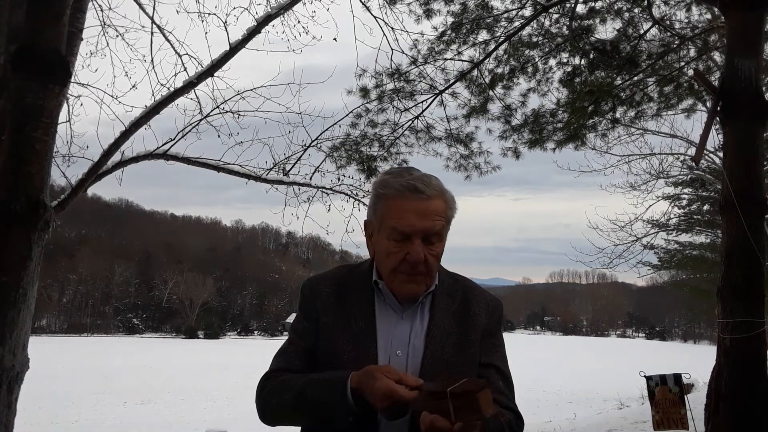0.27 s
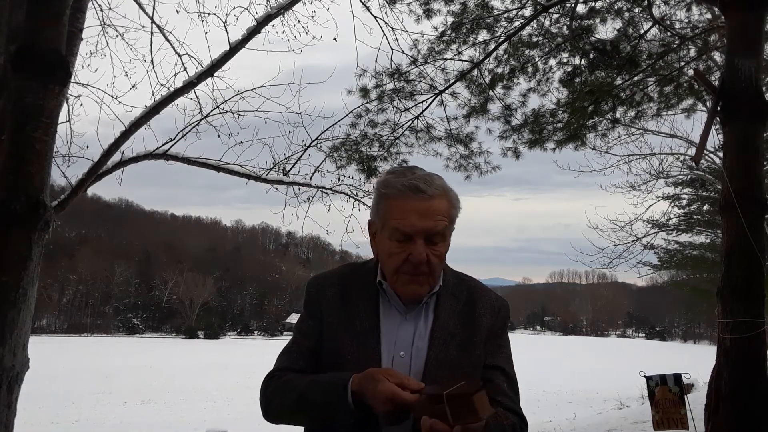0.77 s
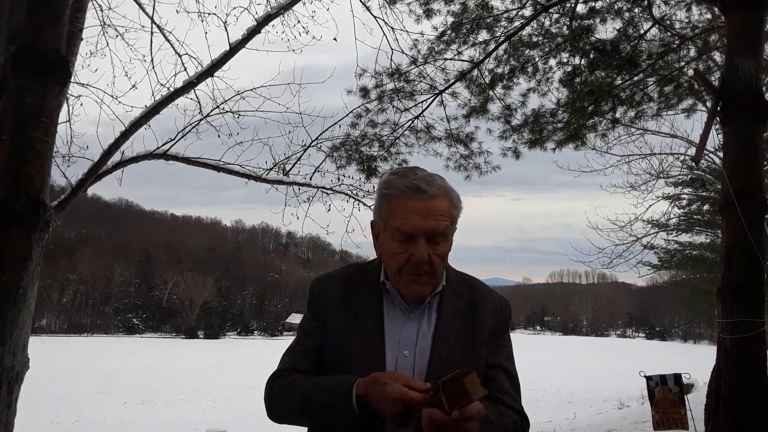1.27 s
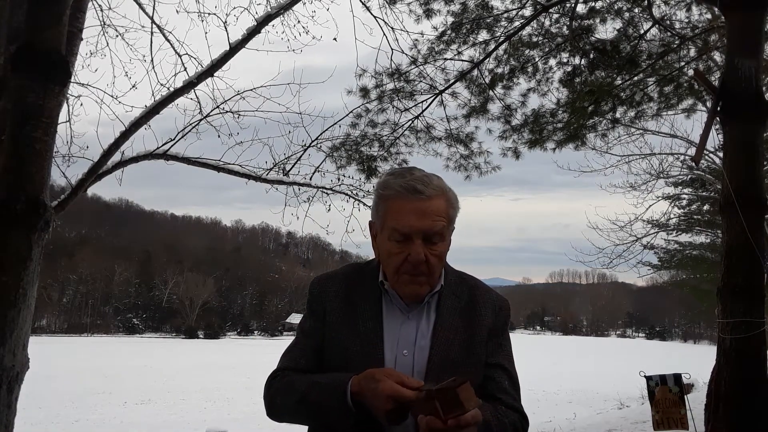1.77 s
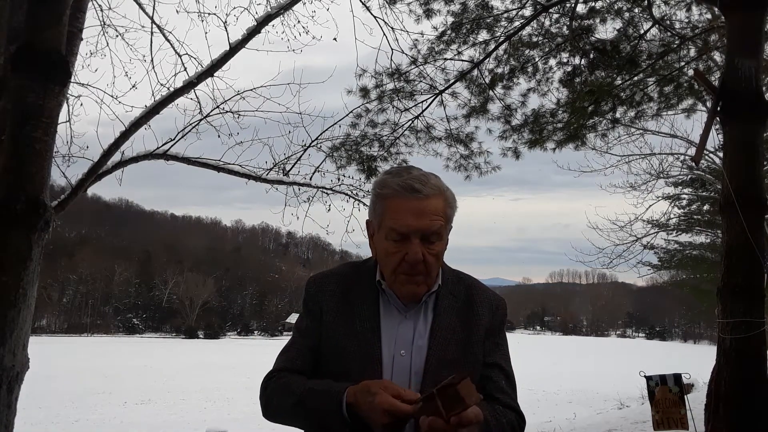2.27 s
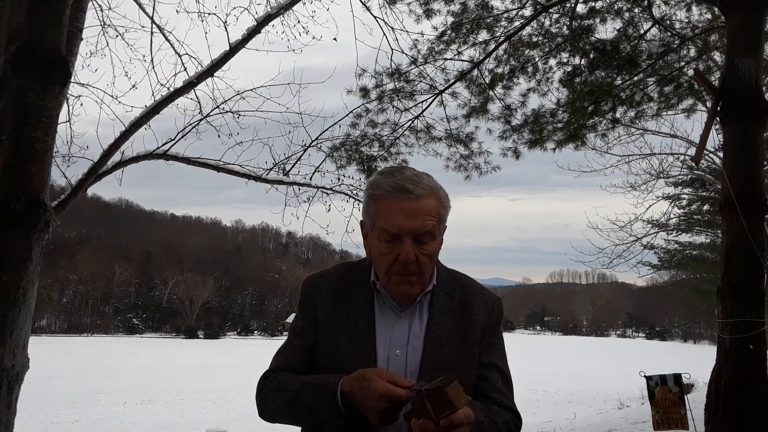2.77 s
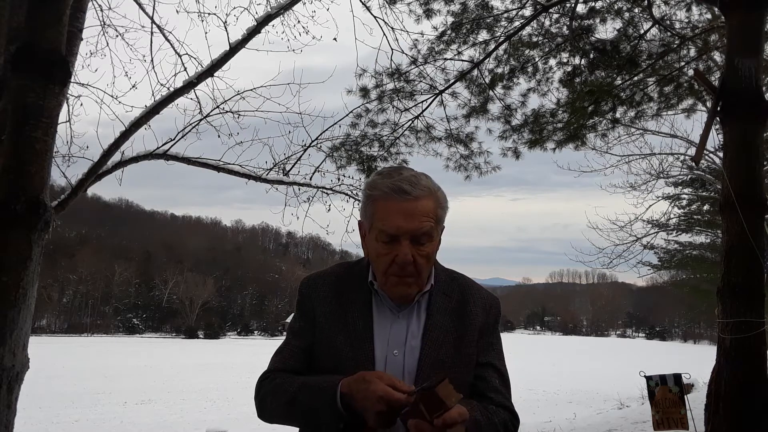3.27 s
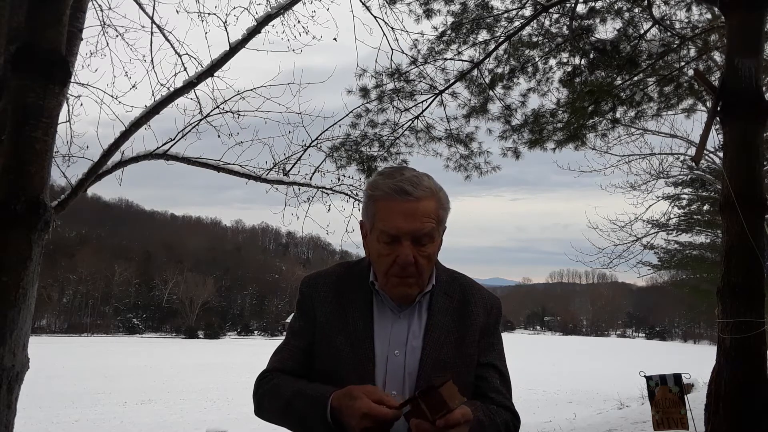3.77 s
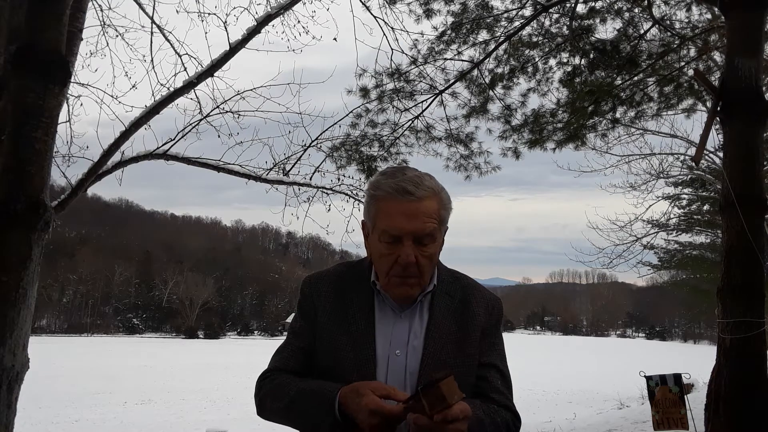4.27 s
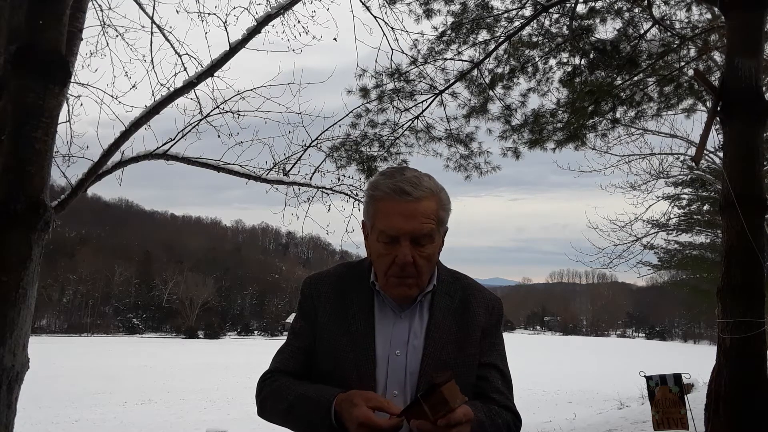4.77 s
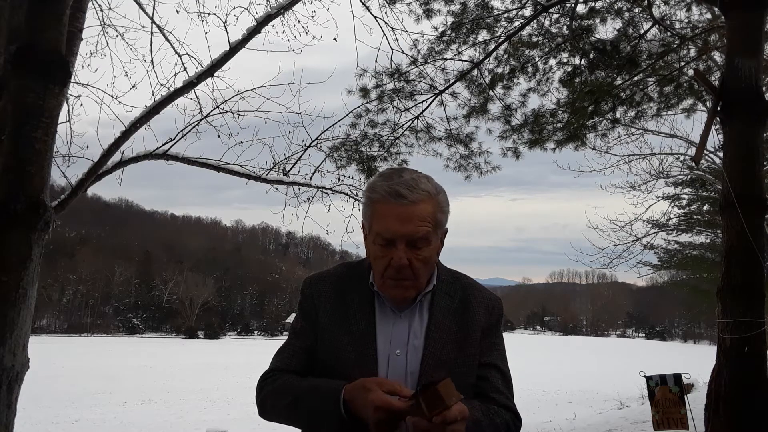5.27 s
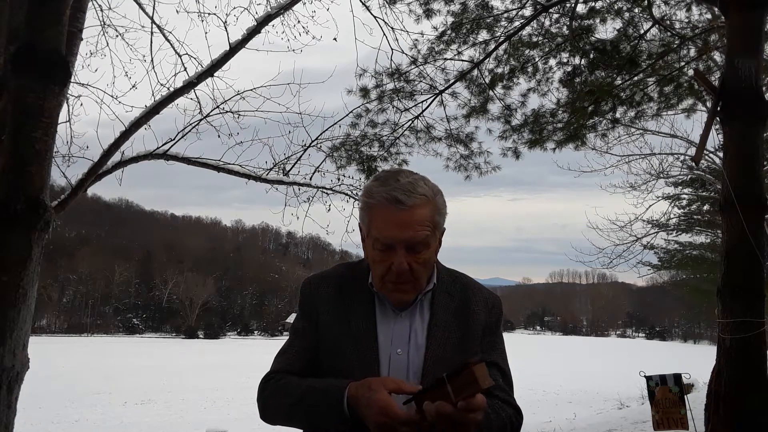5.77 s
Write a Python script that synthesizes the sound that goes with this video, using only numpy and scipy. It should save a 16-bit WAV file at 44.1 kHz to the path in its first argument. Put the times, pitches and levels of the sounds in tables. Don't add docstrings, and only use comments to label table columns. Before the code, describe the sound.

Close by, a hand works a wooden box call outdoors. A few faint trial chirps and clothing ticks come first, then four nasal, raspy yelps, each dropping in pitch. After a pause with light taps, a second run of six yelps follows, with wooden knocks near the end. Low distant traffic and a faint hum lie underneath; trees return a thin echo. Stereo microphone, fairly near.

```python
import sys
import numpy as np
from scipy import signal
from scipy.fft import rfft, irfft
from scipy.io import wavfile
from scipy.ndimage import uniform_filter1d

SR = 44100
rng = np.random.default_rng(int(sys.argv[2]) if len(sys.argv) > 2 else 0)


def boost(x):
    u = np.asarray(x, float) / 20
    return 10 ** u


def waveform_to_disk(signal):
    frames = np.transpose(np.atleast_2d(signal))
    scaled = np.clip(frames, -1, 1) * 32767
    samples = np.round(scaled).astype(np.int16)
    wavfile.write(sys.argv[1], SR, samples)


N = 264776


def rms_one(x):
    return x / np.sqrt(np.mean(x ** 2) + 1e-20)


def at_hz(points, hz):
    points = np.array(points)
    return np.interp(np.log(hz), np.log(points[:, 0]), points[:, 1])


def drift(rate_hz):
    r = np.exp(-2 * np.pi * rate_hz / SR)
    noise = rng.standard_normal(N + 20000)
    return rms_one(signal.lfilter([1], [1, -2 * r, r * r], noise)[20000:])


def band(x, low_hz, high_hz, order=2):
    edges_hz = np.clip([low_hz, high_hz], 10, .45 * SR)
    return signal.sosfilt(signal.butter(order, edges_hz, "band", fs=SR, output="sos"), x)


def resonance(x, hz, width_hz):
    r = np.exp(-np.pi * width_hz / SR)
    zeros = np.array([1, 0, -1]) * (1 - r * r) / 2
    poles = [1, -2 * r * np.cos(2 * np.pi * hz / SR), r * r]
    return signal.lfilter(zeros, poles, x + 1e-18)


def swells(rows, rise):
    t, out = np.arange(N) / SR, np.zeros(N)
    for s, db, length_s in rows:
        near = slice(max(round((s - 4 * length_s) * SR), 0), round((s + 4 * length_s) * SR))
        since = t[near] - s
        out[near] += boost(db) * np.exp(-(since / np.where(since < 0, rise * length_s, length_s)) ** 2)
    return out


def background():
    # (frequency [Hz], level [dB per Hz])
    floor = [(18, -37), (30, -15), (64, -7), (170, -12.5), (280, -18), (480, -6.5), (740, -5), (1350, -8.5),
             (2290, -15.5), (3310, -33.5), (7670, -26.5), (10800, -36.5), (14800, -26.5), (16000, -31)]
    # (frequency [Hz], likeness [-1..1])
    likeness = [(30, .9), (60, 0.67), (240, 0.84), (950, 0), (3770, 0), (15000, 0.026)]
    # (time [s], level [dB], length [s])
    bump_rows = [
        (0.31, -66, 0.2),
        (1.39, -63, 0.18),
        (4.0, -62.5, 0.042),
        (4.26, -58, 0.041),
        (4.89, -59, 0.03),
        (5.32, -62, 0.12),
        (5.75, -71.5, 0.19),
    ]
    floor_db, hum_hz, hum_width_hz, hum_db = -58, 65.6, 2.5, -66.5

    out, edges_hz = 0, 25 * 2 ** np.arange(0, 9.6, .5)
    white = rng.standard_normal((2, 2, N))
    swell_db = 0.89 * drift(0.77)
    for k, (low, high) in enumerate(zip(edges_hz, edges_hz[1:])):
        centre_hz = np.sqrt(low * high)
        mid, side = band(white[k % 2], low, high)
        alike = np.clip(at_hz(likeness, centre_hz), -1, 1)
        stereo = np.sqrt(1 + alike) * mid + np.sqrt(1 - alike) * side * [[1], [-1]]
        out = out + boost(at_hz(floor, centre_hz) + swell_db) * stereo
    out = boost(floor_db) * out / np.std(band(out, 90, 16000))

    throb = resonance(rng.standard_normal(N), hum_hz, hum_width_hz)
    throb = resonance(throb, hum_hz, hum_width_hz)
    steady = np.sqrt(2) * np.sin(2 * np.pi * hum_hz * np.arange(N) / SR)
    hum = boost(hum_db) * (steady + 0.25 * rms_one(throb))
    thud = rms_one(band(rng.standard_normal(N), 90, 420))
    return out + hum + swells(bump_rows, rise=0.55) * boost(2.5 * drift(25)) * thud


def clearing(x):
    # (delay [s], level [dB], left-right [dB])
    echoes = [
        (0.03, -47.5, 5.5),
        (0.051, -33, -17.5),
        (0.104, -39, -10),
        (0.174, -48.5, -13.5),
    ]
    t = np.arange(SR) / SR
    scatter = rng.standard_normal((3, 2, SR)) * boost(4.14 * rng.standard_normal((2, SR)))
    close = (scatter[0, 0] + 0.99 * scatter[0]) * boost(-33.0 - 60 * t / 0.03) * (t > .0005)
    near = scatter[1] * boost(-40.5 - 60 * t / 0.21) * (t > .006)
    for s, db, pan_db in echoes:
        near[:, round(s * SR)] += boost(db + np.array([pan_db, -pan_db]) / 2)
    stands = .5 + np.exp(-((t - .17) / 0.0095) ** 2) + np.exp(-((t - .27) / 0.054) ** 2)
    far = scatter[2] * boost(-57.0 - 60 * t / 0.96) * np.minimum(t / .05, 1) * stands
    body = signal.fftconvolve(x[None], band(close, 480, 11000)[:, :SR // 20], axes=1)[:, :N]
    tail = band(near, 580, 4700) + band(far, 1900, 3000, order=1)
    swaying = boost(4.0 * drift(80) - 0.73)
    return body + signal.fftconvolve(x[None] * swaying, tail, axes=1)[:, :N]


def ticks():
    # (time [s], peak [dB], body below 8 kHz [dB], left-right [dB])
    tick_rows = [(0.2098, -48.5, -1, 17), (0.2366, -40, 0, -1.5), (0.4914, -45, 5, -10), (0.839, -44, 3, 8),
                 (1.0814, -48.5, 6, -16), (1.2868, -44, 15, -29), (1.4433, -40.5, 2.5, -14),
                 (2.0207, -28, -2, -7.5), (2.0748, -37, -1, -18), (2.6906, -29, 1.5, -16.5),
                 (2.7821, -40, 7, -15), (2.8581, -49, 3.5, -1.5), (3.2231, -45, 2, -7.5),
                 (3.3144, -53.5, 5, -9), (3.3914, -43, -4.5, 13), (3.9643, -41, 3, -10),
                 (4.125, -46, 2, -13), (4.155, -42, 2.5, -12), (4.2256, -39, 5.5, -16),
                 (4.2628, -39, 1, -17.5), (4.8708, -32.5, -1, -13), (5.6638, -46.5, -6, -7),
                 (4.633, -46, 3, -9), (4.881, -42.5, 5.5, -10), (4.977, -51, -4, -5),
                 (5.011, -46, -0.5, -5.5), (5.892, -63.5, 10, 0), (5.98, -65, 4, 2), (3.238, -52, 2, -2),
                 (0.001, -35, 7.5, -12), (0.012, -31.5, -2, 2), (0.027, -36.5, 2, -2),
                 (0.0862, -60, 13, -1.5), (0.152, -49, 2, -5), (0.19, -49, -3, 6), (0.426, -50, 5.5, 1),
                 (0.598, -56, -1, 12), (0.731, -54, -11, 3), (1.0241, -54, 11, -8), (1.246, -54, 6, -15),
                 (1.3064, -48, -1, -3), (2.792, -43, -4, -8.5), (3.21, -58, 6.5, 2), (3.245, -59, 8, 4),
                 (3.445, -59, 8, -1.5), (3.631, -57, -5, -2), (5.637, -59, 11, -6)]
    # (time [s], level [dB], length [s])
    rustles = [(.1, -66, 0.85), (.85, -52.5, 0.025), (.96, -71, 0.22), (1.289, -38, 0.022),
               (1.31, -58.5, 0.12), (1.9, -65, 1), (3.85, -63.5, 0.6), (3.3, -71.5, 0.11),
               (5.75, -68.5, 0.052), (1.45, -62.5, 0.27), (2.1, -61.5, 0.49), (2.7, -53.5, 0.044),
               (2.8, -50.5, 0.03), (3.23, -66.5, 0.045), (3.42, -62, 0.015), (4.24, -54.5, 0.054),
               (4.88, -60.5, 0.04), (5.638, -56, .012), (4.995, -57, .008)]
    out, t = np.zeros((2, N + 5000)), np.arange(5000) / SR
    decay = boost(-60 * t / 0.022) + 0.045 * boost(-60 * t / 0.088)
    for s, db, body_db, pan_db in tick_rows:
        grit = rng.standard_normal((2, len(t))) * boost(1.1 * rng.standard_normal(len(t)))
        grit = (0.76 * grit[0] + 0.21 * grit) * decay
        burst = band(grit, 12000, 19000) + boost(body_db - 2.5) * band(grit, 1800, 8500)
        out[:, round(s * SR):][:, :len(t)] += boost(db - 4.5 + np.array([[pan_db], [-pan_db]]) / 2) * burst
    grains = rng.standard_normal((2, N)) * boost(2.5 * np.clip(drift(30), -2, 2))
    brush = band(grains, 500, 5600, order=1) + .2 * band(grains, 11500, 16400)
    return out[:, :N] + swells(rustles, rise=0.27) * rms_one(brush)


def handling():
    # (time [s], level [dB], length [s])
    drags = [
        (.8, -58, 0.053),
        (1.0, -57.5, 0.12),
        (1.09, -65, .03),
    ]
    # (frequency [Hz], width [Hz], level [dB])
    drag_rings = [(1834, 280, 4), (3000, 300, -5), (5286, 820, -15)]
    # (time [s], level [dB], length [s], pitch [Hz])
    palm = [
        (1.945, -59.5, .015, 450),
        (2.022, -55.5, .025, 390),
        (2.092, -56.5, .015, 400),
        (2.17, -61, .08, 175),
    ]
    noise = rng.standard_normal(N)
    ringing = sum(boost(db) * resonance(noise, hz, width_hz) for hz, width_hz, db in drag_rings)
    out = swells(drags, rise=0.49) * rms_one(ringing)
    for s, db, length_s, hz in palm:
        out += swells([(s, db, length_s)], rise=0.74) * rms_one(resonance(noise, hz, 0.12 * hz))
    return out


def knocks():
    # (time [s], peak [dB], pitch [Hz], upper ring [dB])
    knock_rows = [
        (1.395, -41, 463, 0),
        (5.044, -23, 539, -1.5),
        (5.059, -22, 471, -6),
        (5.091, -23, 457.7, -15),
        (5.104, -34.5, 481, 4.5),
        (5.166, -17.5, 359.5, -3.5),
        (5.174, -38.5, 385.5, 9.5),
        (5.283, -36, 674.3, 3.5),
        (5.302, -38, 709, 11.5),
    ]
    out, t = np.zeros(N + 2000), np.arange(2000) / SR
    for s, db, hz, upper_db in knock_rows:
        low = np.sin(2 * np.pi * hz * t) * np.exp(-t / 0.002)
        high = boost(upper_db) * np.sin(2 * np.pi * 1480 * t) * np.exp(-t / 0.0011)
        edge = boost(upper_db - 12.5) * rng.standard_normal(len(t)) * np.exp(-t / 0.00068)
        out[round((s + .001) * SR):][:len(t)] += boost(db + 5.0) * (low - 1.56 * high + edge)
    return band(out[:N], 210, 10000)


def box(x):
    # (frequency [Hz], width [Hz], level [dB])
    modes = [(890, 33, -16.5), (1060, 220, -8), (1340, 209, 3.5), (1940, 540, -6.5), (2264, 160, -0.5),
             (2617, 357, -10), (2950, 74, -13.5), (3500, 970, -24.5), (4008, 170, -11), (5400, 93, -33),
             (6140, 130, -31.5), (7460, 1800, -25.5), (8580, 570, -29)]
    return sum((-1) ** k * boost(db) * resonance(x, hz, width_hz) for k, (hz, width_hz, db) in enumerate(modes))


def taps():
    # (time [s], peak [dB], pitch [Hz])
    tap_rows = [(0.13, -39, 960), (0.1835, -42, 1100), (0.23, -35.5, 1200), (0.443, -38, 1200),
                (0.4856, -45, 1460), (0.607, -43.5, 1400), (1.2203, -42, 1400), (1.8, -38, 1200),
                (1.5385, -38.5, 1500), (1.8546, -40, 1468), (4.5926, -27, 1526), (5.4796, -30.5, 1350),
                (0.297, -46.5, 1200), (3.592, -49, 1300), (5.7031, -34, 1290), (5.795, -46, 1220),
                (3.643, -37, 1600), (4.8, -51, 1450), (2.1, -42, 1800), (0.899, -54, 3500)]
    # (time [s], peak [dB], length [ms], pitch [Hz])
    rub_rows = [(0.928, -38, 10.4, 1530), (1.286, -24.5, 19.3, 2480), (1.395, -31, 4, 3499),
                (2.205, -35, 10.25, 1182), (2.551, -26.5, 7.6, 1577), (2.873, -42, 6.8, 1520),
                (2.955, -47, 24, 1540), (2.983, -42.5, 17, 1366), (3.13, -47, 13.44, 1379),
                (4.268, -25.5, 10.2, 1398), (4.504, -39, 10.7, 1340), (4.572, -37, 23.5, 1419),
                (4.852, -41.5, 14.8, 1377), (5.003, -23.5, 12.8, 1367), (5.149, -35.5, 12.3, 1319),
                (5.636, -18.5, 8.34, 1507)]
    out, t = np.zeros(N + 4000), np.arange(4000) / SR
    touches = [(s, db, 2.5, hz, .4) for s, db, hz in tap_rows]
    touches += [(*row, .2) for row in rub_rows]
    for s, db, length_ms, hz, box_share in touches:
        span_s = max(length_ms, .5) / 1000
        touch = np.minimum(t / (0.069 * span_s), 1) * np.exp(-(t / span_s) ** 2)
        rub = band(rng.standard_normal(len(t)), 520, 3500) * touch
        width_hz = 125 * max(hz / 1400, 1) ** 0.83
        body = resonance(rub, hz, width_hz) + box_share * box(rub)
        body += 0.11 * touch * np.sin(2 * np.pi * hz * t)
        out[round(s * SR):][:len(t)] += boost(db) * body / np.abs(body).max()
    return out[:N]


def cupping():
    # (time [s], second partial [dB], upper partials [dB], left-right [dB])
    poses = np.array([(0, 2.5, -5, -2), (.25, -8, -4, 1), (.37, -6.5, -7, 1), (.715, 1.5, -0.5, 0.5),
                      (1.36, 0, 0, 0), (1.645, 1.5, 1.5, 2), (1.69, 1, -8, -3.5), (1.94, -2, -3.5, 0.5),
                      (1.99, 0.5, 0.5, 0.5), (2.04, 0, -1, -3), (2.295, -2.5, -2.5, -0.5),
                      (2.335, 0.5, 2, -0.5), (2.605, 0, 1.5, 0.5), (2.64, 1, -2.5, 1.5), (2.655, -4, 1, 0),
                      (3.67, -1.5, 3, -0.5), (3.71, -3, -3, -2), (3.735, -4.5, 0.5, 0),
                      (3.985, -8, -0.5, 0.5), (4.005, -4, 2.5, 0), (4.03, -0.5, -1, -3.5),
                      (4.33, 0.5, 4.5, 0), (4.36, -10, 0, 0), (4.665, 6.5, 6, 0.5), (4.70, -3.5, 1.5, -2),
                      (5.065, 2, -2, 0.5), (5.09, -2.5, 3.5, 0), (5.375, -7.5, -0.5, 1.5),
                      (5.42, -3.5, -0.5, 0.5)])
    t = np.arange(N) / SR
    return [np.interp(t, poses[:, 0], poses[:, column]) for column in (1, 2, 3)]


def locks():
    # (firmest grip [s], hold [s], rate [Hz], end rate
    # [Hz], level [dB])
    lock_rows = [ (0.001, 0.0083, 933, 903, -28.5), (0.015, .032, 890, 842, -26),
                 (0.25, 0.0062, 1132, 1213, -44), (0.255, .008, 1342, 1424, -42.5),
                 (0.344, 0.0062, 1291, 1340, -34), (0.364, 0.0035, 1383, 1326, -35),
                 (0.374, 0.011, 1330, 1304, -24.5), (0.711, 0.0089, 1452, 1434, -24.5),
                 (0.723, 0.015, 1383, 1372, -35), (1.339, 0.0028, 1523, 1515, -40),
                 (1.355, 0.019, 1520, 1401, -25.5),
                 (1.642, 0.012, 1450, 1419, -19), (1.651, 0.01, 1446, 1350, -17.5),
                 (1.67, 0.0032, 1283, 1265, -26), (1.684, 0.017, 1439, 1410, -30.5),
                 (1.706, 0.0082, 1200, 1170, -51), (1.924, 0.002, 1319, 1312, -33),
                 (1.933, 0.0037, 1328, 1342, -21), (1.941, 0.0057, 1340, 1345, -13.5),
                 (1.957, 0.0041, 1240, 1191, -17), (1.9638, 0.0048, 1060, 926, -19.5),
                 (1.974, 0.0058, 915, 901, -18.5), (1.981, 0.025, 874.5, 897, -20.5),
                 (2.014, 0.029, 892, 906.5, -31), (2.047, .03, 898, 899.3, -38.5),
                 (2.286, 0.0079, 1313, 1299, -20), (2.296, 0.0092, 1331, 1270, -16.5),
                 (2.321, 0.019, 1020, 990.5, -23), (2.347, 0.0076, 895, 914, -29),
                 (2.595, 0.006, 1312, 1314, -23), (2.607, 0.0094, 1326, 1340, -20.5),
                 (2.628, 0.014, 965, 1009, -20.5), (2.65, 0.010, 880.5, 875, -24),
                 (3.664, 0.0095, 1390, 1340, -18), (3.68, 0.0074, 1243, 1228, -19),
                  (3.691, 0.0022, 1224, 1154, -20), (3.696, 0.0028, 1031, 930, -19),
                  (3.702, .008, 890, 897, -18.5), (3.717, .013, 929, 1072, -19.5),
                  (3.729, .012, 1090, 1092, -21.5), (3.744, 0.0075, 1134, 1074, -31.5),
                  (3.983, 0.0045, 1373, 1310, -18), (3.995, .003, 1242, 1209, -22.5),
                  (4.004, 0.0075, 1150, 955.6, -23.5), (4.015, 0.0031, 930.4, 960.6, -19),
                  (4.021, 0.0099, 1064, 1076, -20.5), (4.318, 0.0072, 1166, 1074, -26.5),
                  (4.327, 0.0066, 1040, 1035, -22), (4.346, 0.0034, 1036, 1047, -23),
                  (4.361, 0.005, 1050, 1041, -22), (4.648, 0.0079, 1147, 1134, -29),
                  (4.66, 0.0041, 1123, 1133, -24), (4.667, 0.011, 1131, 1101, -21),
                  (4.685, 0.0089, 1045, 1015, -20), (4.699, 0.018, 1052, 1083, -22.5),
                  (5.062, 0.0031, 1179, 1106, -18.5), (5.071, 0.027, 1060, 1029, -20.5),
                  (5.367, 0.005, 1327, 1315, -22), (5.371, 0.0064, 1340, 1340, -11.5),
                  (5.384, 0.0089, 1287, 1081, -18), (5.4, 0.018, 1060, 1055, -17),
                  (5.422, 0.016, 1060, 1035, -19.5),]
    # (time [s], level change [dB], length [s])
    skips = [(0.695, -2, .004), (1.668, -11, 0.0019), (1.953, -8, .002), (1.962, -6.5, 0.0023),
             (2.292, 0, 0.0027), (2.584, -6.5, 0.0041), (2.649, 4, 0.0016), (3.655, -7, 0.0055),
             (3.677, -7.5, .002), (3.992, 0, 0.0028), (4.003, -6, 0.0021), (4.31, -26, .004),
             (4.361, -16, 0.0021), (5.055, -17, 0.0042), (1.918, -8, .004), (2.273, -3, .004),
             (0.395, -9.5, .004), (0.054, -7.5, 0.0047), (1.627, 0, .004), (5.381, -7, .002)]
    grip_s, sag_db_per_s, lift_s, glide_s = 0.019, 140.5, 0.03, 0.0014

    t, rows = np.arange(N) / SR, np.array(lock_rows)
    times = np.ravel([rows[:, 0], rows[:, 0] + rows[:, 1]])
    rates = np.ravel(rows[:, 2:4].T)
    order = np.argsort(times)
    level_db = np.full(N, -200.)
    for s, hold_s, hz, _, db in rows:
        near = slice(max(round((s - .1) * SR), 0), round((s + .2) * SR))
        since = t[near] - s
        grip = grip_s * min(hz / 1340, 1) ** 1.3
        gripping_db = 60 * (since / grip) ** 2
        leaving_db = sag_db_per_s * since + 60 * (np.maximum(since - hold_s, 0) / lift_s) ** 1.5
        level_db[near] = np.maximum(level_db[near], db - np.where(since < 0, gripping_db, leaving_db))
    for s, change_db, length_s in skips:
        near = slice(round((s - .03) * SR), round((s + .03) * SR))
        level_db[near] += change_db * np.exp(-((t[near] - s) / length_s) ** 2)
    rate = np.interp(t, times[order], rates[order])
    return uniform_filter1d(rate, size=max(round(glide_s * SR), 1)), level_db


def far_wall():
    # (time [s], length [s], rate [Hz], end rate [Hz], level [dB])
    slides = [
        (0.344, 0.014, 1215, 990, -43),
        (0.347, .03, 1009, 931, -32),
    ]
    partials_db = [-8, 1.5, -24, -29]
    out = np.zeros(N)
    for s, length_s, hz, end_hz, db in slides:
        part = np.linspace(0, 1, round(length_s * SR))
        turns = np.cumsum(hz + (end_hz - hz) * np.sqrt(part)) / SR
        tone = sum(boost(p) * np.sin(2 * np.pi * (k + 1) * turns + k * k) for k, p in enumerate(partials_db))
        out[round(s * SR):][:len(part)] += boost(db) * np.sqrt(2 * np.sin(np.pi * part) + 1e-12) * tone
    return out


def upper_partials(rate, level_db, turns, cup_db, wobble, locked):
    # (rate [Hz], level [dB])
    sharpness = [(900, -2.5), (1040, -6.5), (1150, -7), (1340, -11.5), (1500, -18)]
    # (frequency [Hz], level [dB])
    upper_db = [(2600, -1), (3200, 0.5), (4570, -2.5), (5440, 0.5), (6650, -12), (7360, -6), (8770, -3),
                (9690, -18.5), (14700, -29.5), (16000, -31)]
    upper = boost(level_db + cup_db + at_hz(sharpness, rate) + 0.33 * np.minimum(level_db + 16.5, 0))
    softness_db = 0.28 * np.clip(level_db + 20.0, -20, 0)
    tone = 0
    for k in range(3, 15):
        lock_db = 5.5 + 4 * locked if k == 3 else -7.7 * locked
        gain_db = at_hz(upper_db, k * rate) - 8.5 + lock_db + 2.3 * drift(110) + softness_db * (k - 2)
        scatter = k * wobble * (1 - locked * (k == 3))
        phase = 2 * np.pi * k * turns + 0.603 * k * k + scatter
        tone = tone + upper * boost(gain_db) * (k * rate < 16000) * np.sin(phase)
    return tone


def slip_rasp(rate, level_db, turns, rough, locked):
    pulse_gain = np.sqrt(3 * SR / rate)
    slips = np.diff(np.floor(turns), prepend=0) * rng.uniform(-1, 1, N) * pulse_gain
    thirds = np.diff(np.floor(turns / 3), prepend=0) * pulse_gain
    chalk = rng.standard_normal(N)
    loose = np.minimum(rough, boost(-23))
    drive = rough * locked * thirds + loose * (1 - locked) * (slips + 0.45 * chalk)
    grit = rough * np.clip(rough / boost(-21.0), 0, 1)
    rasp = boost(-1.0) * box(drive) / np.std(box(chalk))
    rasp += boost(-25.0) * grit * band(chalk, 4300, 8800)
    steady_hiss = boost(-6 + level_db + np.minimum(level_db + 21.0, 0))
    return rasp + boost(-43.5 + 4.0 * drift(60)) * (grit + steady_hiss) * band(chalk, 10000, 16000)


def yelps():
    # (frequency [Hz], level [dB])
    wall = [(890, -10), (1000, -9.5), (1055, -4), (1200, -2.5), (1340, -1.5), (1500, -2)]
    # (frequency [Hz], level [dB])
    hollow = [(1790, -3.5), (2000, 6), (2110, -7), (2270, -5), (2450, -4), (2680, -9), (2950, -14)]
    # (time [s], rasp [dB], length [s])
    chatter = [(.046, -39.5, 0.0024), (.243, -49, 0.0042), (.348, -41, 0.02), (.374, -33.5, 0.016),
               (.714, -33, 0.022), (1.359, -37.5, 0.016), (1.638, -27, 0.0033), (1.683, -30, 0.0062),
               (1.940, -14.5, 0.015), (1.968, -27, 0.01), (2.300, -18.5, 0.023), (2.600, -21, 0.018),
               (2.624, -28, .012), (3.660, -26.5, 0.0036), (3.700, -26.5, 0.021), (3.985, -26, 0.025),
               (4.017, -26.5, 0.0035), (3.762, -40, 0.013), (4.376, -39.5, .008), (5.45, -30.5, .008),
               (2.685, -40, .015), (4.745, -45, .02), (4.317, -34, 0.0033), (4.352, -33.5, 0.01),
               (4.652, -30, 0.0046), (4.706, -38.5, 0.026), (5.090, -29.5, 0.012), (5.372, -16.5, 0.022),
               (5.388, -23, 0.0077)]
    rate, level_db = locks()
    second_cup_db, upper_cup_db, _ = cupping()
    climb = np.clip(np.gradient(rate) * SR / 1000 - 2, 0, 4)
    rate = rate * (1 + .004 * drift(150))
    turns = np.cumsum(rate) / SR

    fade_db = 0.46 * np.minimum(level_db + 21.5, 0) * np.clip((990 - rate) / 60, 0, 1)
    first = boost(level_db + at_hz(wall, rate) + fade_db)
    late_db = 0.27 * np.clip(level_db + 26.0, -40, 0)
    second = boost(level_db + at_hz(hollow, 2 * rate) - 1.5 * climb + second_cup_db + late_db)
    tone = first * boost(0.18 * drift(99)) * np.sin(2 * np.pi * turns)
    tone += second * boost(1.8 * drift(100)) * np.sin(4 * np.pi * turns + 0.15)

    rough = boost(level_db - 22) + swells(chatter, rise=0.5)
    uneven = np.clip(rough / (first + second + 1e-9), .3, 1)
    wobble = 0.35 * uneven * drift(130)
    locked = np.clip((rate - 1250) / 60, 0, .65)
    tone += upper_partials(rate, level_db, turns, upper_cup_db, wobble, locked)
    rasp = slip_rasp(rate, level_db, turns, rough, locked)
    tone = np.sqrt(2) * tone + far_wall()
    ring_on = boost(-13.0) * box(tone)
    return band(tone + rasp + ring_on, 620, 19800, order=3)


def to_ports(x):
    # (frequency [Hz], left-right [dB])
    side_db = [(60, -1), (240, -1), (950, -2), (3770, -3.5), (15000, -3)]
    # (frequency [Hz], phase [rad])
    left_lag = [(60, 0), (1000, 0.31), (4000, 1.3), (6200, 1.8), (8700, 2.8), (16000, 5.5)]
    hz = np.fft.rfftfreq(N, 1 / SR) + 1
    half = boost(at_hz(side_db, hz) / 2) * np.exp(-.5j * at_hz(left_lag, hz))
    return irfft(rfft(x) * np.array([half, 1 / half]), N)


def scene():
    call = yelps() + taps() + knocks() + handling()
    turn_db = cupping()[2] / 2
    direct = to_ports(call) * boost(np.array([turn_db, -turn_db]))
    return direct + clearing(call) + ticks() + background()


def roll_off(x):
    return signal.sosfilt(signal.butter(12, 16490, fs=SR, output="sos"), x)


def record(dry):
    top = signal.cheby2(12, 28, 16050, fs=SR, output="sos")
    heard = dry - 0.46 * band(dry, 8600, 11400, order=1)
    return roll_off(signal.sosfilt(top, band(heard, 53, 19800)))


dry = scene()
out = record(dry)
waveform_to_disk(out)
```